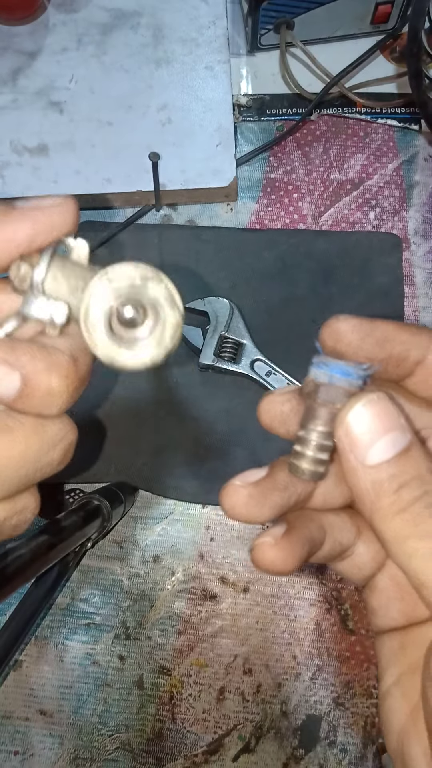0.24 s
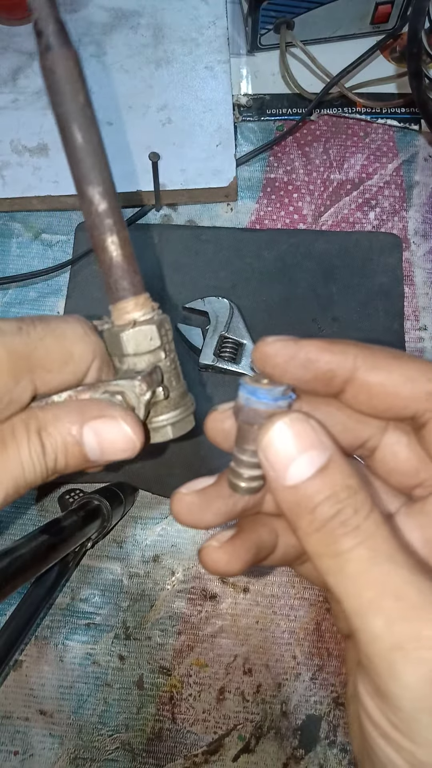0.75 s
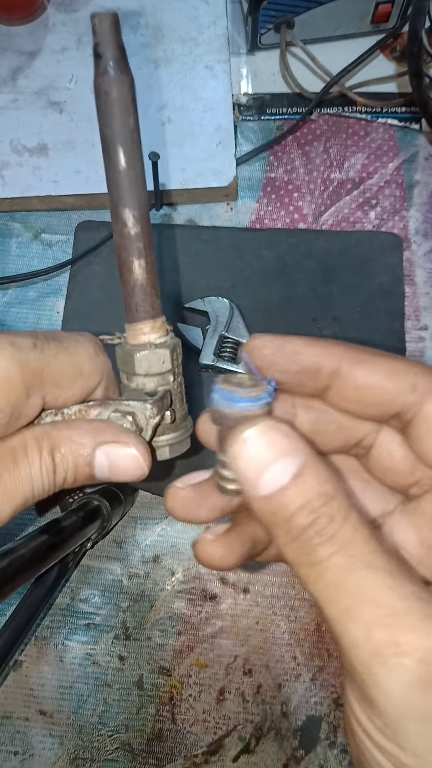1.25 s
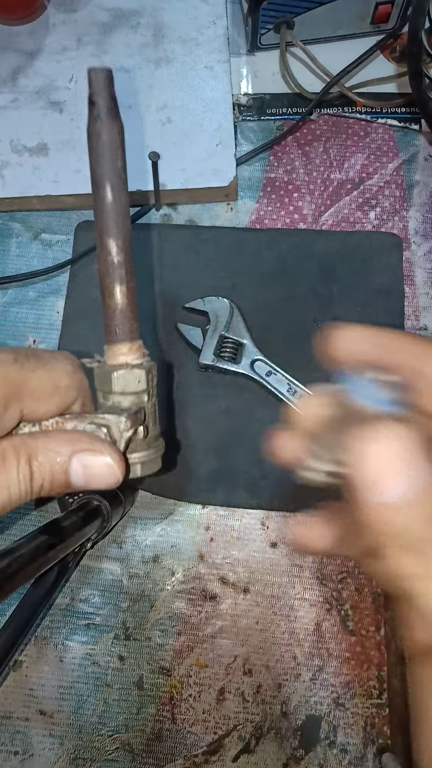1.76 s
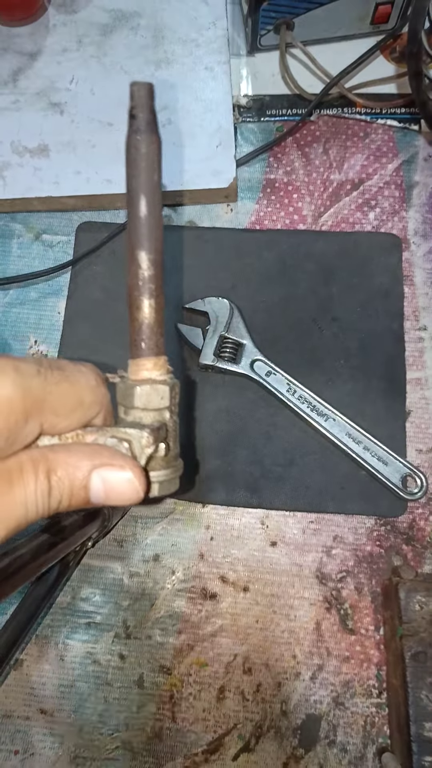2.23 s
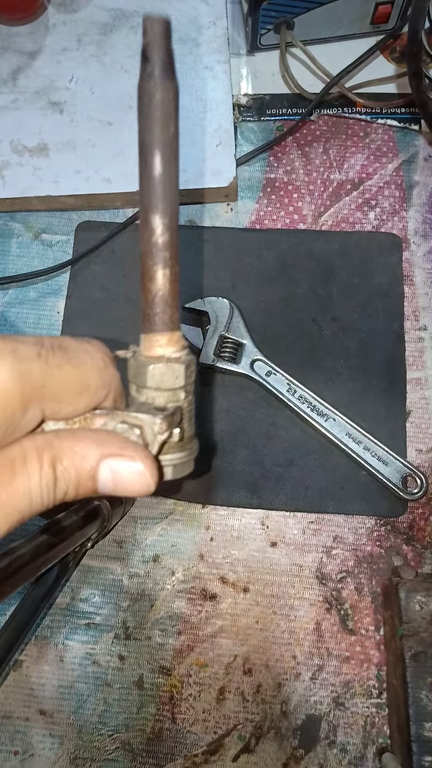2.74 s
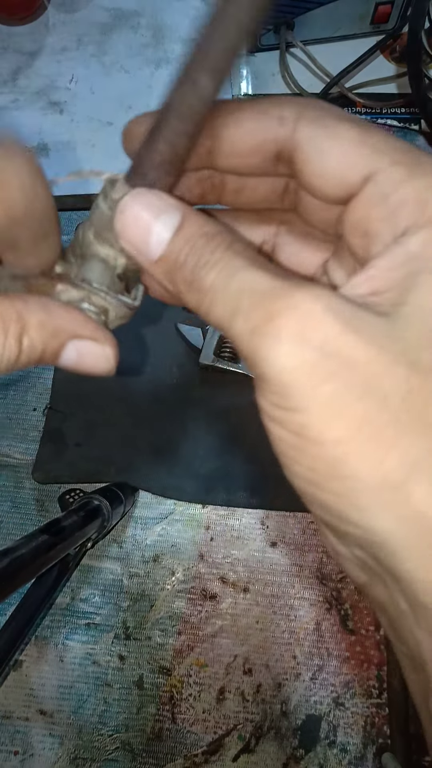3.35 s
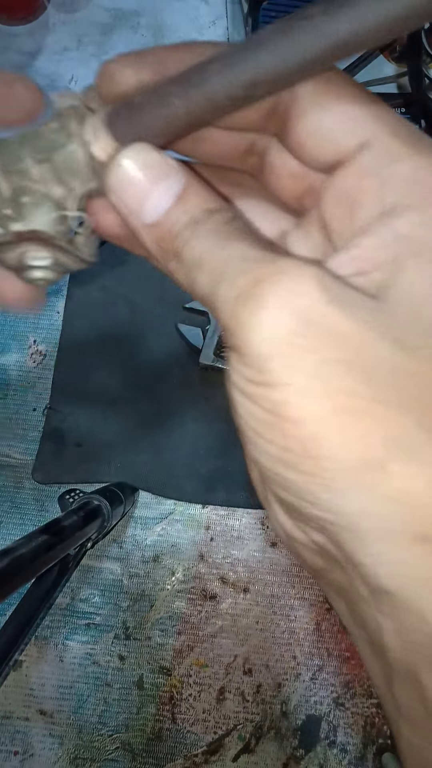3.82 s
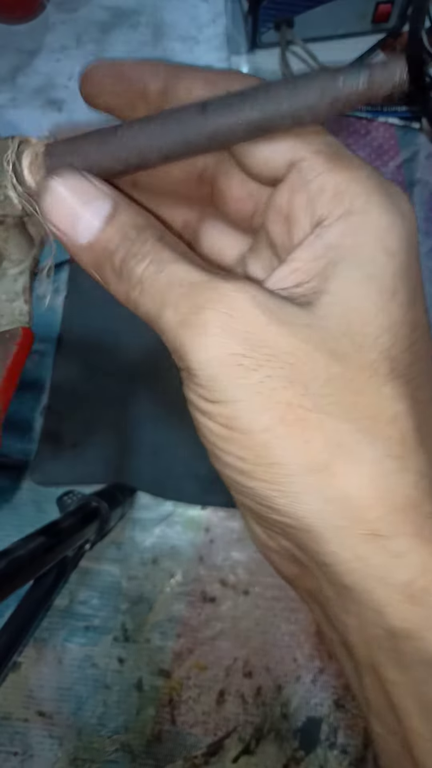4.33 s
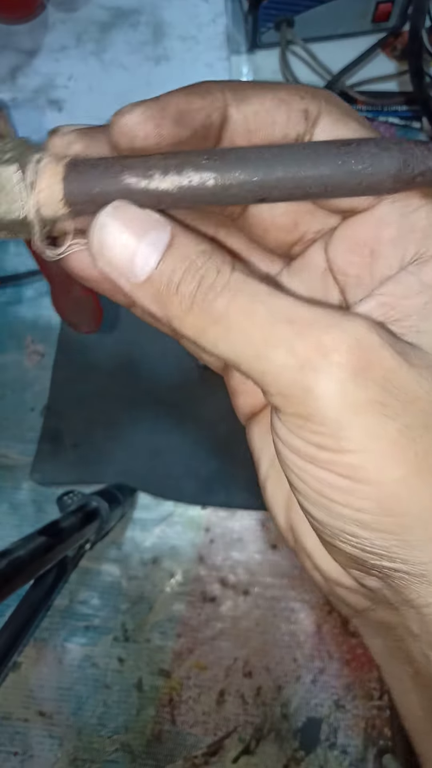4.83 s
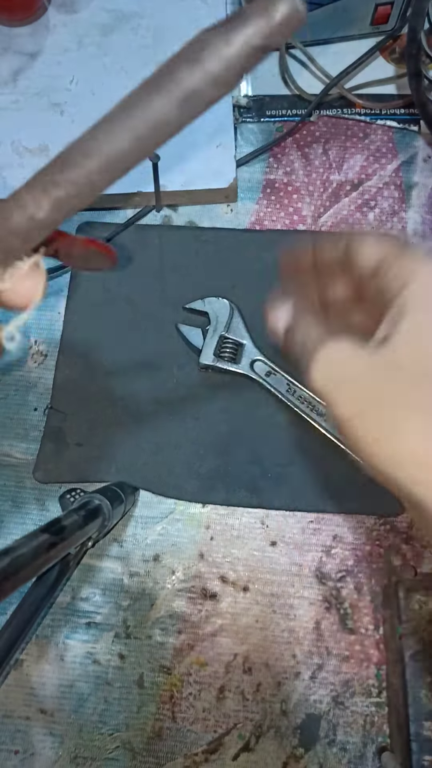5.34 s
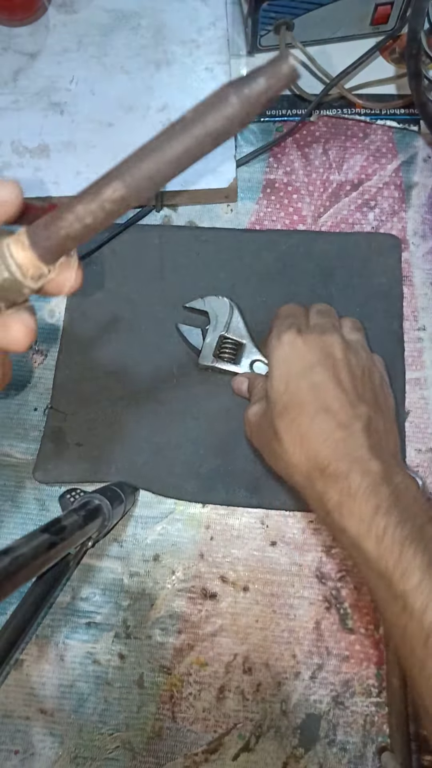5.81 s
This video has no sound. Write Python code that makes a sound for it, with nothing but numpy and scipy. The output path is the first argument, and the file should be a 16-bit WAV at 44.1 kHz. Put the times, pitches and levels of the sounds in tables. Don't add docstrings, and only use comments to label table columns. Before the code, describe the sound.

Low, lumpy wind buffets a microphone over soft fan hiss and faint motor buzz; a small brass fitting clinks down midway, bouncing once.

```python
import sys
import numpy as np
from scipy import signal
from scipy.fft import rfft, irfft, next_fast_len
from scipy.io import wavfile
from scipy.ndimage import uniform_filter1d, minimum_filter1d

SR = 44100
rng = np.random.default_rng(int(sys.argv[2]) if len(sys.argv) > 2 else 0)


def master(y):
    cut = np.clip(np.atleast_2d(y).T, -1, 1)
    pcm = np.round(cut * 32767)
    wavfile.write(sys.argv[1], SR, pcm.astype(np.int16))


def boost_factor(decibels):
    exponent = np.asarray(decibels, float) / 20
    return 10 ** exponent


N = 267677
TIME = np.arange(N) / SR

# freq_hz, level_db
METAL_CONTACT = [(4500, -22), (5800, -12), (6800, 0), (7400, -6), (8400, -14), (9550, -1), (10200, -10),
                 (11300, -9), (12200, -14), (13500, -10), (14600, 1), (15200, -7), (16500, -12),
                 (18000, -40)]


def in_time(rows):
    s, *columns = np.transpose(rows)
    return [np.interp(TIME, s, column) for column in columns]


def rms_one(x):
    return x / np.sqrt(np.mean(x ** 2) + 1e-20)


def colour(x, spectrum):
    size = next_fast_len(N)
    hz, level_db = np.transpose(spectrum)
    log_hz = np.log(np.arange(size // 2 + 1) * SR / size + 1)
    gain = boost_factor(np.interp(log_hz, np.log(hz), level_db, -90, -90))
    return rms_one(irfft(rfft(x, size) * gain, size)[:N])


def drift(rate_hz):
    r = np.exp(-40 * np.pi * rate_hz / SR)
    noise = rng.standard_normal(N // 20 + 2002)
    slow = signal.lfilter([1], [1, -2 * r, r * r], noise)[2000:]
    return np.interp(np.arange(N) / 20, np.arange(len(slow)), rms_one(slow))


def humps(rows, lead_s=None):
    coarse = TIME[::20]
    total = 0
    for s, height, fall_s in rows:
        if lead_s is None:
            shape = np.exp(-((coarse - s) / fall_s) ** 2)
        else:
            shape = np.exp(-np.maximum((coarse - s) / fall_s, (s - coarse) / lead_s))
        total = total + height * shape
    return np.interp(TIME, coarse, total)


def eddy(hz, turns, phase):
    t = np.arange(-3 * turns / hz, 3 * turns / hz, 1 / SR)
    return np.exp(-(t * hz / turns) ** 2) * np.cos(2 * np.pi * hz * t + phase)


def big_eddies():
    # s, peak_db, size_hz, edge_rel_db
    sharp = [(0.059, -0.5, 230, -12), (0.604, -2.5, 290, -6), (0.64, -8, 290, -8), (1.068, -2, 470, -13),
             (1.445, -2, 248, -9), (1.579, 3, 150, -9), (1.657, -2.5, 330, -15), (2.123, 10, 380, -8),
             (2.193, -1, 310, -17), (2.263, 0.5, 300, -29), (2.526, -3, 198, -10), (2.561, -5.5, 220, -10),
             (2.595, 6, 450, -7), (2.626, -4, 298, -18), (2.846, -2, 200, -13), (3.084, 9.5, 180, -17),
             (3.356, -0.5, 350, -16), (3.775, -3.5, 260, -15.5), (3.887, 4.5, 220, -25),
             (3.921, 9.5, 360, -13), (4.062, -2.5, 250, -16), (4.322, -3.5, 340, -19), (4.725, 2, 280, -17),
             (5.566, 1.5, 270, -15), (5.681, 0, 170, -18), (2.283, 2, 300, -10), (5.857, -7.5, 320, -15),
             (5.879, -12.5, 249, -10), (5.926, 3, 260, -5), (5.962, -4, 310, -18)]
    # s, peak_db, size_hz
    rounded = [(0.013, -6, 150), (0.169, 0.5, 210), (0.296, -6, 220), (0.387, -0.5, 270), (0.518, 7.5, 280),
               (0.671, 4, 220), (0.896, 0, 220), (1.142, 0, 210), (1.36, -3, 210), (1.517, -2, 180),
               (1.789, -5, 200), (1.839, -1.5, 200), (6.061, 5.5, 242), (2.161, -11, 180), (2.426, 14, 320),
               (2.697, -7, 250), (3.202, -4.5, 250), (3.554, -6, 180), (3.821, 9, 260), (4.115, -3, 180),
               (4.201, -1.5, 250), (4.273, 7, 200), (4.365, -5, 260), (4.565, -1.5, 130),
               (4.794, -2.5, 200), (4.868, 4.5, 280), (5.364, -3, 170), (5.516, -6, 280), (5.611, -4, 290),
               (5.718, -11, 250)]
    round_edge_db = -23
    return sharp + [(*row, round_edge_db) for row in rounded]


def draught():
    # s, level_db, fineness_db
    steady_rows = [(0.0, -11.5, -3), (0.25, -13, 0.5), (0.45, -15.5, 0.5), (0.75, -12.5, -1),
                   (1.0, -13, -1), (1.2, -10.5, -4.5), (1.6, -15.5, 2), (1.9, -17, 0.5), (2.1, -14.5, 2.5),
                   (2.5, -15, 5), (2.9, -17.5, 4.5), (3.4, -14, -1.5), (3.85, -16.5, 1), (4.3, -12, 3),
                   (4.6, -16.5, 1), (5.1, -15, -1.5), (5.55, -12, 4), (6.07, -13, 4)]
    # s, depth_db, half_length_s
    lulls = [(0.95, 4.5, 0.043), (1.25, 5.5, 0.031), (1.39, 13.5, 0.034), (1.48, 13, 0.014),
             (1.625, 19, .025), (2.58, 7.5, 0.012), (2.97, 16.5, .06), (3.15, 4.5, 0.053),
             (5.13, 3.5, 0.034), (.77, -1.5, 0.026), (3.5, 8.5, 0.045), (4.0, 10.5, 0.022),
             (4.16, 8, 0.033), (4.49, 4.5, 0.082), (4.77, 13.5, 0.018), (5.44, 11, 0.037)]
    gust_db, gust_s = 1.5, 0.023
    fine_offset_db, fine_holds = 5.5, 0.75
    steady_db, fine_db = in_time(steady_rows)
    gusts = [(s, min(boost_factor(peak_db), 1), gust_s) for s, peak_db, *_ in big_eddies()]
    swing_db = gust_db * np.minimum(humps(gusts), 1) - humps(lulls)
    return steady_db + swing_db, fine_offset_db + fine_db - fine_holds * swing_db


def wake():
    fall_s, lead_s = 0.013, 0.0032
    coarse, stir = TIME[::20], 0
    for s, peak_db, *_ in big_eddies():
        shape = np.exp(-np.maximum((coarse - s) / fall_s, (s - coarse) / lead_s))
        stir = np.maximum(stir, boost_factor(peak_db) * shape)
    return np.interp(TIME, coarse, np.minimum(stir, 1))


def buffeting():
    # freq_hz, density_db_per_hz
    turbulence = [(15, -49.5), (25, -13), (68, 1.5), (108, 4), (157, 1.5), (260, -6), (445, -14.5),
                  (817, -31), (1000, -44), (1400, -41.5), (1820, -55), (3080, -120)]
    level_db, fine_db = draught()
    clump, stirred, out = drift(22.8), wake(), np.zeros(N)
    for share, hz in zip(np.linspace(0, 1, 10), np.geomspace(45, 900, 10)):
        born = rng.random(N) < 1.2 * hz / SR
        heights = boost_factor(2.6 * np.minimum(rng.exponential(1, N), 3.5)) * rng.choice([-1, 1], N)
        lump = eddy(hz, turns=0.96, phase=rng.uniform(0, np.pi))
        lumps = rms_one(signal.oaconvolve(born * heights, lump, "same"))
        flicker_db = (1.4 + 1.4 * share) * clump + 2.3 * drift(35)
        wake_db = (1.5 + 7.4 * share) * stirred
        out += lumps * np.sqrt(hz) * boost_factor(flicker_db + wake_db + share * fine_db)
    return boost_factor(level_db - 1) * colour(out, turbulence)


def add(out, lump, s):
    start = round(s * SR) + SR // 2 - len(lump) // 2
    out[start:start + len(lump)] += lump


def puffs():
    trail_db, trail_size, trail_turns_late = -5, 0.65, 1.3
    edge_lead_s = .0008
    out = np.zeros(N + SR)
    eddies = big_eddies()
    chances = rng.uniform(-1, 1, (len(eddies), 3))
    for (s, peak_db, hz, edge_db), (side, skew, spin) in zip(eddies, chances):
        sign, body_db = np.sign(side), min(peak_db, 0)
        body = eddy(0.95 * hz, turns=0.49, phase=0.88 * skew)
        add(out, sign * boost_factor(body_db) * body, s)
        trail = eddy(trail_size * hz, turns=0.87, phase=1.5 * spin)
        add(out, -sign * boost_factor(body_db + trail_db) * trail, s + trail_turns_late / hz)
        edge = eddy(680 + 120 * skew, turns=0.57, phase=np.pi * spin)
        add(out, boost_factor(min(peak_db, -2) + min(edge_db, -10) + 2.5) * edge, s - edge_lead_s)
    return out[SR // 2:][:N]


def ring(clicks, hz, t60_s):
    r, w = boost_factor(-60 / (t60_s * SR)), 2 * np.pi * hz / SR
    return signal.lfilter([0, np.sin(w)], [1, -2 * r * np.cos(w), r * r], clicks + 1e-18)


def housing(chatter, shade):
    # freq_hz, width_hz, rel_db, slope_db_per_shading
    resonances = [(1653, 41, -10, -9.5), (2003, 325, -6, -8.5), (2906, 170, -10, 1), (5990, 150, -35, 0.5),
                  (6850, 310, -33.5, -5), (11300, 200, -38, -4.5), (13550, 200, -38, 0.5),
                  (14300, 200, -39, -2)]
    out = np.zeros(N)
    for hz, width_hz, level_db, slope_db in resonances:
        drive = chatter if hz > 10000 else 1
        band = rms_one(drive * ring(rng.standard_normal(N), hz, 1.5 / width_hz))
        out += band * boost_factor(level_db + slope_db * shade + 1.5 * drift(0.62))
    return out


def fan():
    # s, fan_change_db, shading (-1..1)
    hands = [(0, 3.5, -0.17), (.3, 2.5, -0.43), (.5, 3, -0.072), (1.0, 0, -0.44), (1.3, -0.5, -0.17),
             (1.5, 1, -0.073), (1.85, 0, 0.53), (2.1, 0.5, -0.12), (2.35, -0.6, 0.17), (2.9, -3, -0.33),
             (3.4, 1.1, 0.56), (3.74, 4, .6), (4.0, 2.5, 0.77), (4.6, 1, 0.55), (5.0, 1, -0.16),
             (5.4, 5.5, 0.42), (5.7, 3, 0.54), (6.07, 2, 0.85)]
    # s, depth_db, recovery_s
    ducks = [(.08, 4, 0.029), (.375, 6, 0.037), (.6, 3.5, 0.08), (1.645, 6, 0.044), (2.18, 1, 0.078),
             (3.25, 2, .03), (3.8, 6.5, 0.11), (4.28, 3.5, 0.079), (4.71, 3.5, 0.058), (4.86, 2.5, 0.078),
             (5.6, 2, 0.0234), (5.77, 7.5, 0.0266), (5.91, 7.5, 0.074)]
    # freq_hz, density_db_per_hz
    air_spectrum = [(450, -15.5), (750, -0.5), (1000, -7.5), (1150, -5), (1400, -7.5), (1620, -4.5),
                    (1950, -5), (2400, -12), (2850, -12.5), (3350, -14.5), (3850, -17.5), (4500, -21),
                    (5450, -36.5), (6200, -58)]
    # freq_hz, density_db_per_hz
    upper_spectrum = [(4500, -28), (5450, -22), (6000, -1.5), (6400, -2), (6800, -1), (7250, -1.5),
                      (7800, -9.5), (8200, -7), (8700, -12), (9300, -11.5), (9900, -23), (10500, -29.5),
                      (12000, -21), (16000, -15.5)]
    # freq_hz, density_db_per_hz
    buzz_spectrum = [(9000, -35), (10200, -10.5), (10900, -10), (11250, -12), (11800, -8.5), (12100, -3),
                     (12400, -7.5), (12900, -8), (13500, -10.5), (13850, 1), (14250, -5), (14600, 0),
                     (15100, -4.5), (15800, -5.5)]
    fan_db, duck_attack_s = -36.5, .015
    mains_twice_hz, buzz_start_s, swell_at_s = 100.59, .0009, .0062
    buzz_rise_s, buzz_fall_s = .0006, .0024

    change_db, shade = in_time(hands)
    change_db = change_db - humps(ducks, duck_attack_s)
    shelf_db = -2.5 + 1 * shade
    upper_db = -25.5 + 1.6 * shade
    buzz_db = -29 + 1.8 * shade
    swell = np.cos(2 * np.pi * mains_twice_hz * (TIME - swell_at_s))

    air = colour(rng.standard_normal(N), air_spectrum)
    shelf_band = signal.butter(2, [2150, 3700], "band", fs=SR, output="sos")
    shelf = signal.sosfiltfilt(shelf_band, air)
    lift = boost_factor(0.83 * (shelf_db + 4.5))
    air = shelf * lift + (air - shelf) / lift
    air = air * boost_factor(2.0 * swell + 0.64 * drift(12.0) + 1.82)

    upper = colour(rng.standard_normal(N), upper_spectrum)
    upper = upper * boost_factor(upper_db + 1.5 * swell + .5 * drift(12) + 0.7)

    since = (TIME - buzz_start_s) % (1 / mains_twice_hz)
    pulse = (1 - np.exp(-since / buzz_rise_s)) * np.exp(-since / buzz_fall_s)
    chatter = .28 + pulse * boost_factor(1.2 * drift(30) + 6)
    buzz = colour(rng.standard_normal(N) * chatter, buzz_spectrum) * boost_factor(buzz_db + 2.5)
    return boost_factor(fan_db + change_db) * (air + upper + buzz + housing(chatter, shade))


def burst(carrier, s, level_db, t60_s):
    since = np.maximum(TIME - s, 0)
    return carrier * boost_factor(level_db - 60 * since / t60_s) * (1 - np.exp(-since / .0015))


def fitting():
    # s, knock_db, knock_t60_s, sizzle_db, sizzle_t60_s
    blows = [
        (2.5185, -23.5, .18, -24, .085),
        (2.5620, -26, .08, -32, .06),
        (2.5890, -33, .05, -60, .03),
        (2.6040, -29, .07, -60, .03),
    ]
    modes_hz = [3548, 4125, 5766, 6788, 6998, 7327, 9480, 9609, 9798, 9889, 10558, 10564, 12610, 14530,
                14625, 14980, 15290]
    # first_db, first_t60_s, bounce_db, bounce_t60_s
    mode_rows = [(-25.5, .3, -33, .04), (-32, .25, -45, .25), (-48, .25, -54, .08), (-26, .18, -45, .28),
                 (-44, .15, -54, .1), (-34, .5, -39, .11), (-40, .15, -42, .07), (-42, .25, -43, .36),
                 (-35, .3, -34, .22), (-46, .2, -44, .15), (-44, .3, -43, .5), (-50, .6, -45.5, .5),
                 (-47, .3, -51, .33), (-37, .15, -47, .12), (-32, .2, -36, .15), (-35, .15, -46, .12),
                 (-45, .1, -56, .1)]
    # freq_hz, level_db
    knock_spectrum = [(600, -14), (1000, -6), (1900, 0), (2300, -3), (2900, -2), (3500, 0), (4200, -7),
                      (5000, -24), (6500, -35)]
    # peak_db, t60_s, freq_hz
    thump = (-5, .22, 165)
    # level_db, t60_s, low_hz, high_hz
    thud = (-13, 0.25, 220, 950)
    first_s, bounce_s, settle_s = [row[0] for row in blows[:3]]
    knock = colour(rng.standard_normal(N), knock_spectrum)
    sizzle = colour(rng.standard_normal(N), METAL_CONTACT)
    first, second = np.maximum(TIME - first_s, 0), np.maximum(TIME - bounce_s, 0)
    before_bounce = np.exp(-second / .0012)
    out = np.zeros(N)
    for hz, (first_db, t60_s, bounce_db, bounce_t60_s) in zip(modes_hz, mode_rows):
        free = boost_factor(first_db - 60 * first / t60_s) * (1 - np.exp(-first / .0015)) * before_bounce
        damped = boost_factor(bounce_db - 60 * second / bounce_t60_s) * (1 - before_bounce)
        out += (free + damped) * np.sin(2 * np.pi * hz * first)
    for s, knock_db, knock_t60_s, sizzle_db, sizzle_t60_s in blows:
        out += burst(knock, s, knock_db, knock_t60_s)
        out += burst(sizzle, s, sizzle_db, sizzle_t60_s)
    level_db, t60_s, hz = thump
    out += burst(np.sin(2 * np.pi * hz * first), first_s + .003, level_db, t60_s)
    level_db, t60_s, low_hz, high_hz = thud
    bench_band = signal.butter(2, [low_hz, high_hz], "band", fs=SR, output="sos")
    bench = rms_one(signal.sosfilt(bench_band, rng.standard_normal(N)))
    return out + burst(bench, settle_s, level_db, t60_s)


def tool():
    # s, level_db, t60_s
    snap_rows = [
        (5.946, -47, 0.0137),
        (6.039, -40, .012),
    ]
    # s, peak_db, freq_hz, t60_s
    tick_rows = [
        (5.946, -42, 14500, .008),
        (5.946, -44, 13600, .008),
        (5.946, -49, 11100, .018),
        (5.946, -45, 8180, .01),
        (5.946, -52.5, 7600, .04),
        (5.946, -49, 5550, 0.035),
        (6.039, -31, 6300, 0.0082),
        (6.039, -33, 7200, 0.0084),
        (6.039, -58, 9400, 0.0087),
        (6.000, -30, 2940, .025),
    ]
    build_s = .0006
    snap = colour(rng.standard_normal(N), METAL_CONTACT)
    out = sum(burst(snap, *row) for row in snap_rows)
    for s, peak_db, hz, t60_s in tick_rows:
        since = np.maximum(TIME - s, 0)
        envelope = boost_factor(peak_db + 3 - 60 * since / t60_s) * (1 - np.exp(-since / build_s))
        out += envelope * np.sin(2 * np.pi * hz * since)
    return out


def scene():
    return (buffeting() + puffs() + fan() + fitting() + tool())[None]


def roll_off(x):
    return signal.sosfilt(signal.butter(12, 16030, fs=SR, output="sos"), x)


def record(dry):
    ceiling, reach = .97, round(0.003 * SR)
    bass_cut = signal.butter(2, 36, "high", fs=SR, output="sos")
    treble_cut = signal.ellip(12, .1, 25, 15530, fs=SR, output="sos")
    dry = signal.sosfiltfilt(bass_cut, dry)
    room = np.minimum(1, ceiling / (np.abs(dry) + 1e-9))
    room = minimum_filter1d(room, size=2 * reach + 1)
    held = dry * uniform_filter1d(room, size=reach)
    return roll_off(signal.sosfiltfilt(treble_cut, held))


dry = scene()
out = record(dry)
master(out)
```